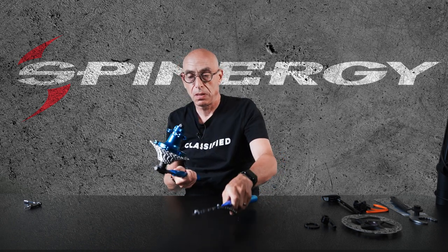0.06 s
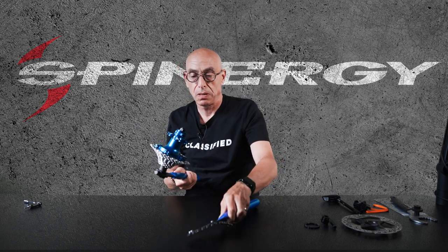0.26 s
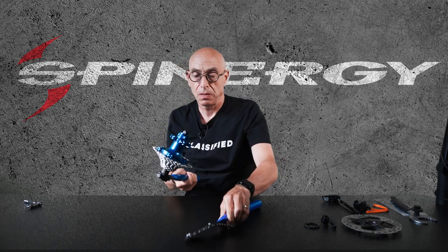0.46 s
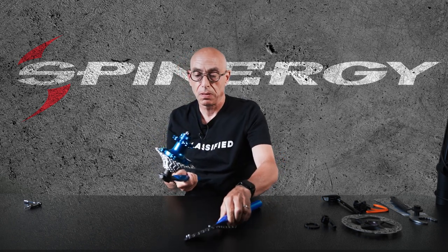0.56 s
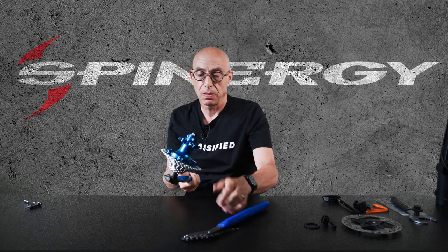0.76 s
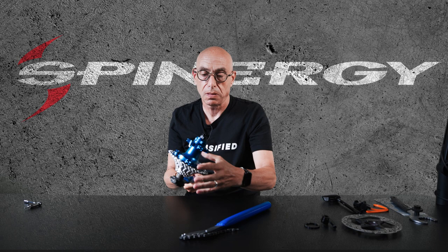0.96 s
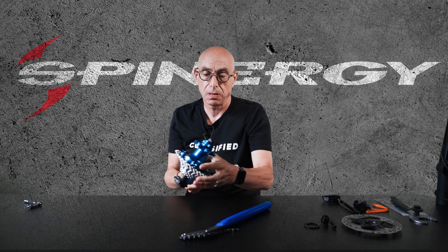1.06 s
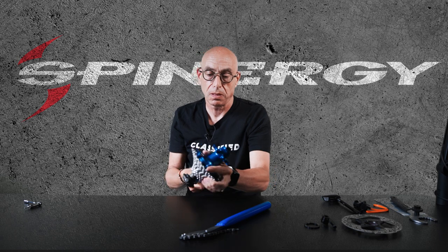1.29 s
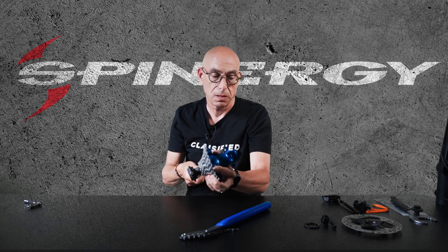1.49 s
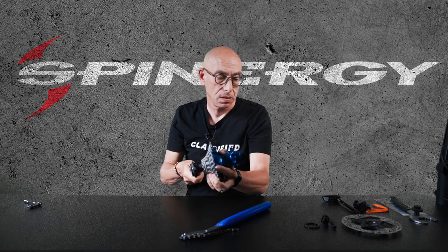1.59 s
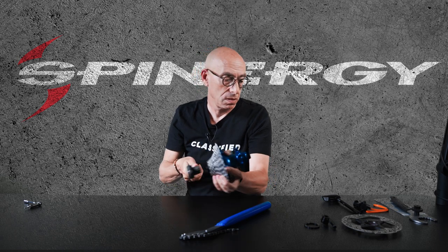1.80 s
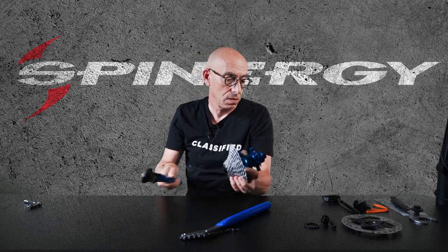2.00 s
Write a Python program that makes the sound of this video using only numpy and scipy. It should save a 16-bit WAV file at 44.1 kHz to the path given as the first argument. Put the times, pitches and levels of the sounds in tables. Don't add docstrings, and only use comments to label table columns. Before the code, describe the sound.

Close up in a small studio, a heavy hand tool thumps and clatters onto a resonant table top, settles, then softer handling, a brief light clink and a sharp metallic click over low ventilation rumble.

```python
import sys
import numpy as np
from scipy import signal
from scipy.fft import rfft, irfft
from scipy.io import wavfile

SR = 44100
rng = np.random.default_rng(int(sys.argv[2]) if len(sys.argv) > 2 else 0)


def inscribe(sig):
    pcm = np.round(np.clip(np.atleast_2d(sig).T, -1, 1) * 32767)
    wavfile.write(sys.argv[1], SR, pcm.astype(np.int16))


def level_to_linear(level):
    exponent = np.asarray(level, float) / 20
    return 10 ** exponent


N = 90404

# f/Hz, level/dB per Hz
FLOOR_SPECTRUM = [(12, -41), (20, -13.5), (55, 1.5), (93, -9.5), (150, -15.5), (337, -14.5), (1090, -22),
                  (1440, -26), (16000, -40.5)]
# t/s, peak level/dB, contact hardness f/Hz, weight on the low modes/dB, contact focus/Q
KNOCKS = [(0.2145, -13, 620, -5.5, 1), (0.2983, -30.5, 2500, -8.5, 0.76), (0.3945, -13.5, 609.5, -6, 1.1),
          (0.4748, -35, 2500, -12.5, 2.1), (0.5277, 3, 2050, -8.5, 0.74), (0.6499, -18.5, 3280, -16.5, 4.4),
          (.6650, -2.5, 880, 2, 1.35), (0.6945, -11.5, 1460, 7.5, 0.96), (.6962, -7, 1800, -2, 0.84),
          (0.7127, -17, 1300, -1.5, 0.27), (0.7188, -8.5, 600, 5.5, 1.9), (0.7673, -4.5, 2110, -1, 1.6),
          (0.7832, -8.5, 2030, 1, 0.6), (0.8625, -18, 800, -15, 0.92), (.895, -25, 700, 5, 1.4)]
LANDING_PART = [0, 4, 0, 4, 1, 4, 2, 4, 4, 4, 3, 1, 4, 2, 3]
BENCH_HZ = [185.7, 242, 294.5, 361, 534.4, 600, 880, 659, 1235, 1590, 2039, 2173, 2430, 146]
# level/dB, t60/s
BENCH_MODES = [(-9, 0.043), (-12, 0.2), (-10, 0.12), (-5.5, 0.035), (-4, 0.055), (-2, 0.028), (-0.5, 0.044),
               (-5.5, 0.028), (-6, .025), (2.5, 0.025), (-8, 0.047), (-2, 0.034), (-1, 0.051), (-16, 0.12)]
PART_DRIVE = [
    (-5.5, 3, -10, 2, -3.5, -11, -5.5, 3.5, -4, -0.5, -1, -1.5, -8, .1),
    (0.2, 5, 1, 1.4, 0.5, 4.5, 3.5, -10.5, -7.5, 1.5, 6, -0.5, 2, 0.11),
    (0, .1, -5, -14, 2, -12.5, 2.5, -8, -3.5, -7.5, -8.5, -8, -12, .1),
    (10.5, -0.29, 10.8, -8, -1, 9, -14, 9.8, -2.5, -6, -0.5, -2.5, -7.5, .1),
    (1.2, 2, 5, 2.3, -4, 4.5, -5.5, -1, 0.85, 4, 0.4, 0.35, -2.6, .1),
]
# t/s, peak level/dB, f/Hz, t60/s
SINGLE_RINGS = [(0.2167, -48, 4110, 0.058), (0.225, -51.5, 6760, 0.064), (0.2361, -43, 4070, 0.036),
                (.415, -38, 3960, 0.0061), (0.533, -54.5, 9600, 0.069), (0.53, -56, 11250, 0.1),
                (0.556, -41.5, 6500, 0.024), (0.668, -37.5, 6700, 0.013), (0.693, -18.5, 4570, .015),
                (0.768, -25.5, 3040, 0.013), (0.896, -47, 4040, 0.024), (1.544, -51, 2997, 0.016),
                (1.739, -46.5, 727, 0.016), (1.7391, -38.5, 2070, 0.011), (1.7389, -38.5, 2680, 0.0071),
                (1.783, -52, 3660, 0.058), (1.8066, -31, 5770, 0.014), (1.807, -67, 7200, .012),
                (.6505, -33.5, 2030, .03), (1.2345, -58.5, 7650, 0.026), (1.2444, -54, 7250, 0.019),
                (0.7679, -25, 2430, 0.09),
                (.2155, -22, 418, 0.044), (.2155, -20.5, 705, 0.047), (.2195, -21, 826, 0.049),
              (.3958, -19.5, 424, 0.035), (.3958, -22, 694, 0.044), (.3995, -22.5, 827, 0.042),
              (.529, -10.5, 2069, 0.047), (.529, -11.5, 1590, 0.03), (.529, -14, 980, 0.069),
              (.531, -21, 263, 0.14), (.6665, -18, 909, 0.062), (.7678, -22.5, 3360, 0.025),
              (1.169, -56, 4930, 0.15), (1.168, -51, 6095, .14), (1.8085, -36.5, 709.5, 0.085),
              (1.8095, -42.5, 1102, 0.12), (1.797, -52, 3690, 0.054), (1.796, -52, 7040, 0.059)]
# t/s, peak level/dB, centre f/Hz, decay/s
JOSTLES = [(.2145, -53, 5780, .002), (.2245, -66.5, 7950, .002), (.2355, -51.5, 6300, 0.0023),
           (.299, -47.5, 4006, 0.001), (.396, -55, 5120, 0.013), (.415, -50.5, 6000, .002),
           (.423, -49, 7447, 0.0042), (.4755, -50.5, 4472, 0.0024), (.5279, -29.5, 6500, 0.0008),
           (.5281, -27, 4000, 0.001), (.5295, -30, 4323, 0.0027), (.528, -38, 11100, .001),
           (.7678, -27, 4000, .001), (.558, -44.5, 7620, 0.0022), (.6507, -30.5, 5000, 0.0007),
           (.666, -36.5, 6000, 0.0027), (.678, -35, 5160, 0.0031), (.684, -33, 4450, 0.0069),
           (.708, -39.5, 3730, 0.013), (.694, -30.5, 7010, 0.00075), (.7005, -48.5, 8550, .001),
           (.763, -42, 7820, 0.0013), (.771, -53.5, 7940, 0.0029), (.783, -41, 6270, 0.0012),
           (.81, -46, 5000, 0.003), (.968, -62, 7600, 0.0025), (1.008, -52, 4563, 0.00043)]
# t/s, peak level/dB, centre f/Hz, decay/s
HANDLING = [(1.236, -50.5, 6500, 0.0021), (1.243, -53, 6850, 0.0023), (1.2895, -53, 4004, 0.00054),
            (1.375, -45, 1500, 0.0025), (1.388, -55, 2020, 0.0019), (1.504, -61, 4000, 0.0012),
            (1.541, -47.5, 4500, 0.0012), (1.631, -46.5, 7440, 0.0029), (1.644, -59.5, 7200, 0.0016),
            (1.786, -39, 1576, 0.011), (1.7835, -45, 2800, 0.016), (1.788, -49, 2300, 0.0092),
            (1.798, -52, 2560, 0.005), (1.813, -46, 2420, .002), (1.236, -50, 2200, 0.0027),
            (1.809, -40, 5990, 0.0013), (1.813, -57.5, 6360, 0.025), (1.954, -48.5, 6000, 0.0013),
            (1.987, -49.5, 4010, 0.00075), (2.02, -48, 1500, 0.0069)]
# t/s, peak level/dB
CLINKS = [
    (1.1668, -33),
    (1.1678, -34),
    (1.1695, -40.5),
    (1.1715, -30),
    (1.1728, -36.5),
    (1.174, -37),
]
CASSETTE_HZ = [1900, 2690, 3214, 4258, 4900, 2250, 6062, 7000, 7671, 9028, 10280, 10540, 12200, 4734]
# level/dB, t60/s
CASSETTE_MODES = [(-5, 0.012), (-9, 0.05), (-9, 0.03), (-4, 0.018), (-10, .1), (-7, 0.02), (-8, 0.08),
                  (-11, 0.02), (-10, .05), (-13, 0.035), (-15, 0.05), (-13, 0.04), (-16, 0.021), (-17, .1)]
# t/s, peak level/dB
RELEASE = [
    (1.8088, -23.5),
    (1.8096, -23),
    (1.8128, -31.5),
    (1.8145, -31),
    (1.818, -19),
    (1.822, -55),
]
SOCKET_HZ = [5400, 4300, 3100, 2000, 2600, 3652, 4900, 5900, 6060, 6750, 7030, 7600, 14400, 8200]
# level/dB, t60/s
SOCKET_MODES = [(-12, 0.015), (-12, 0.012), (-11, 0.01), (-8, 0.012), (-8, .012), (-13, 0.03), (-8, 0.022),
                (-6, 0.012), (-4, 0.016), (-9, 0.03), (-4, 0.022), (-9, 0.02), (-24, 0.04), (-8, .012)]
# f/Hz, t60/s, level/dB
ROOM_TAIL = [(94, 0.55, -3.5), (188, 0.74, -2), (424, 0.34, 4), (800, 0.24, 2), (1500, 0.23, 5),
             (2500, 0.3, -2), (5000, 0.37, -10), (9860, 0.077, -3)]
# f/Hz, level/dB, t60/s
ROOM_MODES = [(183, -41, 0.31), (332, -42, 0.33), (541.6, -40, .28), (614, -46, 0.28), (986, -47.5, 0.34),
              (1252, -43, 0.23), (1541, -43.5, .22), (1783, -51.5, 0.18), (2188, -42.5, 0.15),
              (2500, -47.5, 0.25)]

LOW_MODES_HZ, BENCH_SPREAD_DB = 420, 1.0
SLAP_DB, SLAP_DECAY_S = -5, 0.0083
RADIATES_HZ, SLAP_CUT_HZ = 83, 3300
SKIRT = 0.21
ECHO_S, ECHO_DB, ECHO_FADE_S = 0.0037, -3, 0.0012
HUM_HZ, HUM_DB, HUM_T60_S = 203, -43.5, 1.3
DENSE_DB = 18.5
MODES_WET_DB, RINGS_WET_DB, CHAIN_WET_DB = -10.5, -12, 9.5
HANDS_WET_DB, SOCKET_WET_DB, HANDS_WET_CUT_HZ = -0.5, -2, 3700
ROOM_DB, ROOM_ONSET_S = -2, 0.006


def coloured(x, points):
    hz, db = np.transpose(points)
    f = np.fft.rfftfreq(len(x), 1 / SR)
    gain = level_to_linear(np.interp(np.log(f + 1), np.log(hz), db))
    return irfft(rfft(x) * gain, len(x))


def band(x, low, high):
    return signal.sosfilt(signal.butter(2, [low, high], "band", fs=SR, output="sos"), x)


def ring(x, hz, t60):
    r, w = level_to_linear(-60 / (t60 * SR)), 2 * np.pi * hz / SR
    return signal.lfilter([0, np.sin(w)], [1, -2 * r * np.cos(w), r * r], x + 1e-18)


def train(s, gains):
    out = np.zeros(N)
    np.add.at(out, (np.asarray(s) * SR).astype(int), gains)
    return out


def struck(s, db, modes, spread_db):
    luck = rng.normal(0, 1, (len(s), len(modes)))
    out = np.zeros(N)
    for k, (hz, level_db, t60) in enumerate(modes):
        clicks = train(s, level_to_linear(db + level_db + spread_db * luck[:, k]))
        out += ring(clicks, hz, t60) * (-1) ** k
    return out


def floor():
    x = coloured(rng.standard_normal(N), FLOOR_SPECTRUM)
    return level_to_linear(-56) * x / x.std()


def bench():
    out, feed, t = np.zeros(N + SR), np.zeros(N + SR), np.arange(SR) / SR
    for (s, db, hz, low_db, focus), part in zip(KNOCKS, LANDING_PART):
        modes = []
        for f, (level, t60), drive in zip(BENCH_HZ, BENCH_MODES, PART_DRIVE[part]):
            modes.append((f, level + drive + low_db * (f < LOW_MODES_HZ), t60))
        body = struck([0], np.zeros(1), modes, BENCH_SPREAD_DB)[:SR] / 4
        slap = rng.standard_normal(SR) * np.exp(-t / SLAP_DECAY_S)
        body = body + level_to_linear(SLAP_DB) * slap

        w = 2 * np.pi * hz
        b, a = signal.bilinear([w * SKIRT, w * w], [1, w / max(focus, 0.3), w * w], SR)
        body, pulse = signal.lfilter(b, a, [body, level_to_linear(DENSE_DB) * (t == 0)])
        gain = level_to_linear(db) / np.abs(body).max()

        hum = level_to_linear(db + HUM_DB + low_db) * np.sin(2 * np.pi * HUM_HZ * t) * level_to_linear(-60 * t / HUM_T60_S)
        echo = gain * body * level_to_linear(ECHO_DB) * np.exp(-t / ECHO_FADE_S)
        i, j = int(s * SR), int((s + ECHO_S) * SR)
        out[i:i + SR] += hum - gain * body
        out[j:j + SR] -= echo
        feed[i:i + SR] += gain * (body * level_to_linear(MODES_WET_DB) + pulse)
    return band([out[:N], feed[:N]], RADIATES_HZ, SLAP_CUT_HZ)


def rustle(rows):
    width = 1.4
    out, t = np.zeros(N + 4000), np.arange(4000) / SR
    for s, db, hz, decay in rows:
        grit = rng.standard_normal(4000) * np.exp(-t / decay)
        i = int(s * SR)
        out[i:i + 4000] += level_to_linear(db + 3.5) * band(grit, hz / width, hz * width)
    return out[:N]


def ticks():
    return sum(ring(train([s], level_to_linear(db)), hz, t60) for s, db, hz, t60 in SINGLE_RINGS)


def room(x):
    hz, t60, db = np.transpose(ROOM_TAIL)
    t, tail = np.arange(SR // 2) / SR, 0
    edges = 70 * 2 ** np.arange(0, 8.1, 0.5)
    for low, high in zip(edges, edges[1:]):
        at = np.log(np.sqrt(low * high))
        level, decay = np.interp(at, np.log(hz), db), np.interp(at, np.log(hz), t60)
        tail = tail + band(rng.standard_normal(len(t)), low, high) * level_to_linear(level - 60 * t / decay)
    tail = tail * (1 - np.exp(-(t / ROOM_ONSET_S) ** 2))

    standing = sum(level_to_linear(db - 60 * t / t60) * np.sin(2 * np.pi * f * t) for f, db, t60 in ROOM_MODES)
    standing = standing * (1 - np.exp(-t / ROOM_ONSET_S))
    return signal.fftconvolve(x, tail * level_to_linear(-28 + ROOM_DB) + standing)[:N]


def metal(rows, pitches, modes, crack_db):
    s, db = np.transpose(rows)
    burst = rng.standard_normal(400) * np.exp(-np.arange(400) / SR / 0.00082)
    crack = np.convolve(train(s, level_to_linear(db + crack_db)), burst)[:N]
    return struck(s, db - 9.5, np.c_[pitches, modes], spread_db=4.5) + band(crack, 1700, 8000)


def scrape():
    count = int(500 * 0.025)
    s = np.sort(rng.uniform(1.794, 1.807, count))
    db = -55 + rng.normal(0, 4, count)
    return metal(np.c_[s, db], SOCKET_HZ, SOCKET_MODES, crack_db=12.0)


def scene():
    knocks, feed = bench()
    links = ticks()
    chain = rustle(JOSTLES)
    hands = rustle(HANDLING) + metal(CLINKS, CASSETTE_HZ, CASSETTE_MODES, crack_db=1.5) + scrape()
    socket = metal(RELEASE, SOCKET_HZ, SOCKET_MODES, crack_db=-9.0)

    shield = signal.butter(2, HANDS_WET_CUT_HZ, "high", fs=SR, output="sos")
    open_side = signal.sosfilt(shield, hands + level_to_linear(SOCKET_WET_DB) * socket)
    send = feed + level_to_linear(RINGS_WET_DB) * links + level_to_linear(CHAIN_WET_DB) * chain + level_to_linear(HANDS_WET_DB) * open_side
    return (knocks + links + chain + hands + socket + room(send) + floor())[None]


def roll_off(x):
    return signal.sosfilt(signal.butter(12, 16920, fs=SR, output="sos"), x)


def record(dry):
    mix = np.clip(dry, -1.0, 1.0)
    return roll_off(mix)


dry = scene()
out = record(dry)
inscribe(out)
```